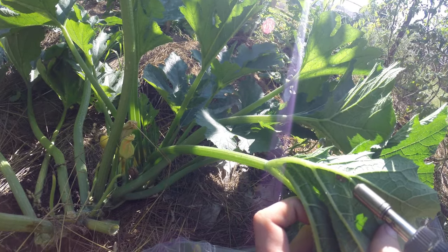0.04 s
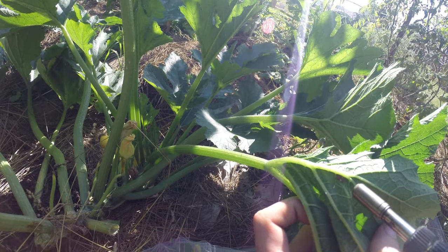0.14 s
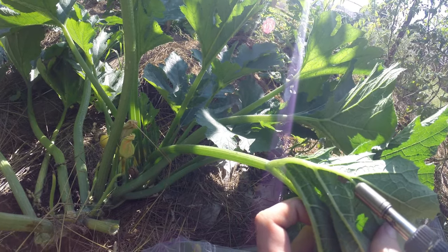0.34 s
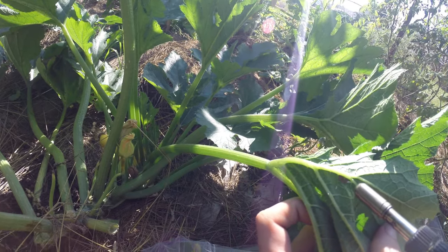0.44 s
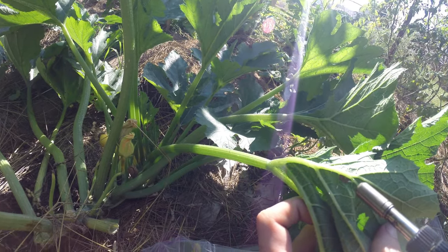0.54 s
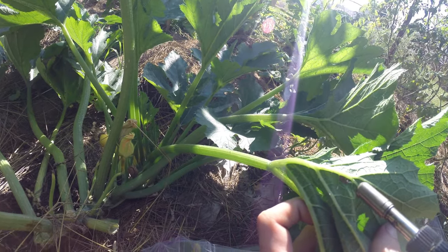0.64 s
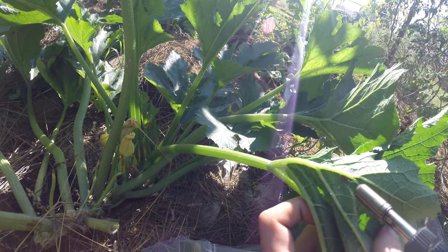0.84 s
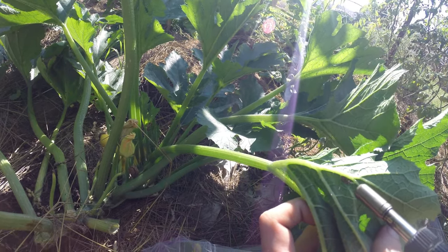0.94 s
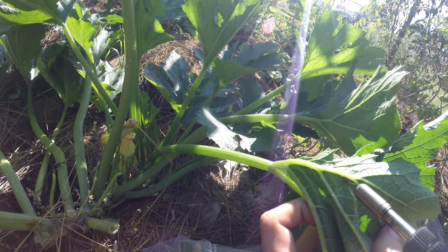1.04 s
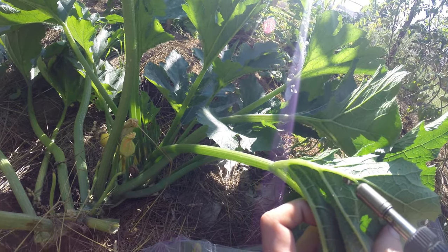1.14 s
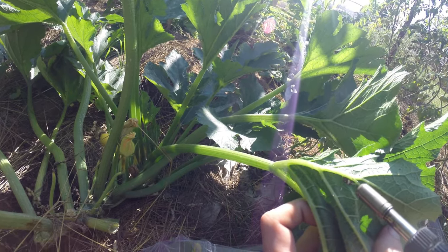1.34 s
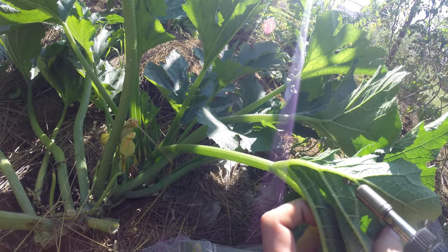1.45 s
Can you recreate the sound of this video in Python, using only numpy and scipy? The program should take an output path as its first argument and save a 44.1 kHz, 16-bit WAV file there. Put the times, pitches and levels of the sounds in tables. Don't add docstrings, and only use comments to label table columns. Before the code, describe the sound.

Tiny dry snaps and soft thuds of bursting eggs on a leaf, with quiet hiss and distant rumble

```python
import sys
import numpy as np
from scipy import signal
from scipy.fft import rfft, irfft
from scipy.io import wavfile
from scipy.ndimage import uniform_filter1d

SR = 44100
rng = np.random.default_rng(int(sys.argv[2]) if len(sys.argv) > 2 else 0)


def to_linear_factor(level_db):
    exponent = np.asarray(level_db, float) / 20
    return 10 ** exponent


def to_wav(sig):
    pcm = np.clip(np.atleast_2d(sig), -1, 1) * 32767
    pcm = np.round(pcm).astype(np.int16)
    wavfile.write(sys.argv[1], SR, pcm.T)


N = 66150


def evened(x):
    return x / np.sqrt(np.mean(x ** 2) + 1e-20)


def add(mix, start_s, sound):
    part = mix[round(start_s * SR):][:len(sound)]
    part += sound[:len(part)]


def shaped_noise(magnitude, size):
    hop = size // 4
    real, imag = rng.standard_normal((N // hop + 5, size // 2 + 1, 2)).T
    spectra = (real + 1j * imag) * magnitude
    return signal.istft(spectra, nperseg=size, noverlap=size - hop)[1][:N]


# time in seconds, hiss level in dB, share of the whistle band (0 to 1).
TORCH_COURSE = [(0, -54.5, 0.063), (.5, -53, 0.27), (.9, -53.5, 0.33), (1.22, -53.5, 1), (1.5, -54.5, 0.24)]
# centre in Hz, width in Hz, level in dB.
HISS_BANDS = [(3510, 97, -1), (4830, 720, 1), (5860, 720, -1), (7180, 1000, 0), (11150, 1040, -2),
              (13300, 1200, -7), (14800, 300, -19)]


def torch():
    hz = np.fft.rfftfreq(256, 1 / SR)[:, None]
    frame_s = np.arange(N // 64 + 5) * 64 / SR
    time_s, level_db, share = np.transpose(TORCH_COURSE)

    def bump(centre_hz, width_hz):
        return 1 / (1 + ((hz - centre_hz) / (width_hz / 2)) ** 2) ** 2

    bed_db, flicker_db = -8, 0.2
    power = to_linear_factor(2 * bed_db) * bump(5560, 11000)
    for centre_hz, width_hz, db in HISS_BANDS:
        power = power + to_linear_factor(2 * db) * bump(centre_hz, width_hz)
    whistle = np.clip(np.interp(frame_s, time_s, share), 0, 1)
    power = power + 3 * whistle * bump(9340, 1000)
    flicker = evened(uniform_filter1d(rng.standard_normal(len(frame_s)), 4))
    hiss = evened(shaped_noise(np.sqrt(power) * to_linear_factor(flicker_db * flicker), size=256))
    return hiss * to_linear_factor(np.interp(np.arange(N) / SR, time_s, level_db))


# frequency in Hz, density in dB per Hz.
WASH_SPECTRUM = [(12, -51), (20, -17.5), (59, -5.5), (86, -7), (214, -11), (280, -20.5), (811, -16),
                 (1290, -22.5), (4000, -51), (5200, -77), (8800, -120)]


def traffic_wash():
    wash_db, patchy_db = -46.5, -0.5
    hz = np.fft.rfftfreq(2048, 1 / SR)
    point_hz, point_db = np.transpose(WASH_SPECTRUM)
    patches = rng.standard_normal((N // 512 + 5, len(hz))).T
    patches = evened(uniform_filter1d(uniform_filter1d(patches, 14, 0), 5, 1))
    spectrum_db = np.interp(np.log(hz + 1), np.log(point_hz + 1), point_db)[:, None]
    return to_linear_factor(wash_db) * evened(shaped_noise(to_linear_factor(spectrum_db + patchy_db * patches), size=2048))


# centre in Hz, width in Hz, level in dB.
ENGINE_PARTIALS = [
    (58, 4.8, -48.5),
    (112, 7.4, -57.5),
]


def engine_drone():
    hz = np.fft.rfftfreq(N, 1 / SR)
    out = np.zeros(N)
    for centre_hz, width_hz, db in ENGINE_PARTIALS:
        resonance = 1 / (1 + ((hz - centre_hz) / (width_hz / 2)) ** 2)
        out += to_linear_factor(db) * evened(irfft(rfft(rng.standard_normal(N)) * resonance, N))
    return out


# start in seconds, level in dB, length in seconds.
SPUTTER_EVENTS = [
    (0.145, -55.5, 0.0043),
    (1.004, -61.5, 0.034),
    (1.11, -57, 0.0062),
    (1.143, -62, 0.0053),
    (1.309, -57, 0.004),
]


def sputters():
    drive = np.zeros(N)
    for start_s, db, length_s in SPUTTER_EVENTS:
        progress = np.minimum(np.arange(1000) / SR / length_s, 1)
        spray = signal.lfilter([1, -0.11], 1, rng.standard_normal(1000))
        add(drive, start_s, to_linear_factor(db) * spray * np.sin(np.pi * progress ** 0.57))
    return drive


# frequency in Hz, level in dB, t60 in seconds, polarity.
CASE_MODES = [(776.4, -6.1, .0086, 1), (1439, 1.7, .0012, -1), (1795, -18, .012, -1), (3060, -17, .011, -1),
              (3650, -22, .011, -1), (4180, -6.3, .0036, -1), (4600, -9.5, .007, -1), (5350, -.5, .0018, 1),
              (7280, -8.2, .0026, -1), (8690, -12.2, .0012, -1), (9810, -8.9, .0031, 1),
              (11030, -8.2, .0017, 1), (12780, -11.3, .0047, -1), (14800, -26, .004, 1)]


def case_ring(t):
    ring = np.zeros(len(t))
    for hz, db, t60_s, polarity in CASE_MODES:
        ring += np.sign(polarity) * to_linear_factor(db - 60 * t / t60_s) * np.sin(2 * np.pi * hz * t)
    leaf_ring = to_linear_factor(-10.5 - 60 * t / .0122) * np.sin(2 * np.pi * 788.6 * t)
    return ring - leaf_ring


# delay in seconds, level in dB, polarity.
LEAF_PATHS = [
    (0, -6.5, 1),
    (.000185, -10.5, 1),
    (.000277, 0, 1),
    (.00092, -12.4, -1),
]


def through_case(drive):
    scatter_db, scatter_t60_s, scatter_low_hz = -17, 0.015, 4900
    ground_s, ground_band_hz, ground_db = .0029, (2400, 3900), -10
    lead = 8
    t = np.arange(1500) / SR
    taps = np.zeros(len(t))
    for delay_s, db, polarity in LEAF_PATHS:
        taps += polarity * to_linear_factor(db) * np.sinc((t - delay_s) * SR - lead)

    scatter = rng.standard_normal(len(t)) * (rng.random(len(t)) < .15) * (t > .0012)
    scatter = signal.lfilter(*signal.butter(2, scatter_low_hz, "high", fs=SR), scatter)
    scatter = scatter * to_linear_factor(scatter_db - 60 * t / scatter_t60_s)

    ground = np.roll(taps, round(ground_s * SR))
    ground = signal.lfilter(*signal.butter(1, ground_band_hz, "band", fs=SR), ground)
    arrivals = taps - to_linear_factor(ground_db) * ground + scatter

    response = np.convolve(case_ring(t), arrivals)[lead:len(t)]
    response = signal.lfilter(*signal.butter(2, 383, "high", fs=SR), response)
    response = response / abs(response).max()
    return signal.oaconvolve(drive, response)[:N]


# start in seconds, level in dB, pitch in Hz, number of turns.
THUD_EVENTS = [
    (.2207, -20.5, 605, 3.9),
    (.2215, -35, 230, 1.8),
    (.4158, -32, 650, 2.2),
    (.6946, -35, 600, 1.6),
    (.7064, -20, 700, 2.1),
    (.7966, -30, 560, 1.7),
    (1.2128, -29, 700, 2.3),
    (1.3075, -32, 800, 2.1),
]


def thuds():
    glide_per_s, overtone_ratio, overtone_db = 65, 2.8, -22.5
    out = np.zeros(N)
    for start_s, db, hz, turns in THUD_EVENTS:
        t = np.arange(0, turns / hz, 1 / SR)
        phase = 2 * np.pi * hz * t * (1 + glide_per_s * t / 2)
        swell = np.sin(np.pi * (t * hz / turns) ** .7) ** 2
        push = np.sin(phase) + to_linear_factor(overtone_db) * np.sin(overtone_ratio * phase)
        add(out, start_s, -to_linear_factor(db) * swell * push)
    return out


# start in seconds, level in dB, snap width in microseconds.
SNAP_EVENTS = [(.2222, -35, 53), (0.3537, 2, 21.4), (.4162, -45, 35), (0.4184, -31.5, 11),
               (.70663, -9, 17.5), (.7969, -46, 120), (.6945, -32, 8), (.69483, -33, 8), (1.2122, -26, 8),
               (1.21253, -27, 8), (1.3079, -38, 8), (1.2382, -4, 16.5), (1.2453, -3, 10.5),
               (1.3078, -14.5, 92)]


def snaps():
    drive, t = np.zeros(N), np.arange(N) / SR
    for start_s, db, width_us in SNAP_EVENTS:
        bell = np.exp(-.5 * ((t - start_s) / (max(width_us, 8) * 1e-6)) ** 2)
        drive += to_linear_factor(db) * bell / bell.sum()
    return drive


def scene():
    background = torch() + traffic_wash() + engine_drone()
    top_cut = signal.ellip(10, .5, 60, 15200, fs=SR, output="sos")
    eggs = through_case(sputters() + snaps()) + thuds()
    return (eggs + signal.sosfilt(top_cut, background))[None]


def low_pass(x):
    return signal.sosfilt(signal.butter(12, 16520, fs=SR, output="sos"), x)


def record(dry):
    return low_pass(dry)


dry = scene()
out = record(dry)
to_wav(out)
```